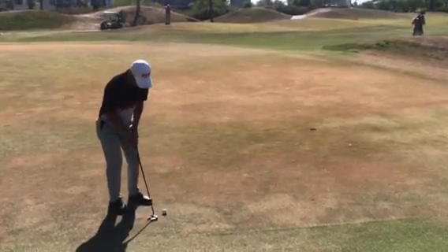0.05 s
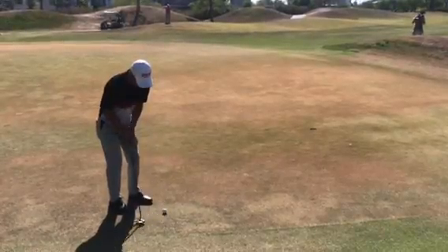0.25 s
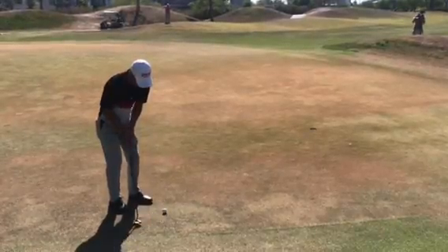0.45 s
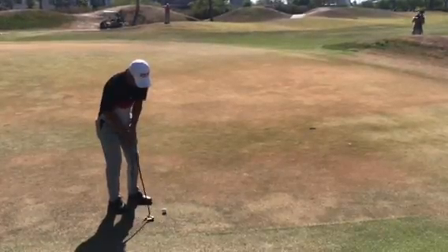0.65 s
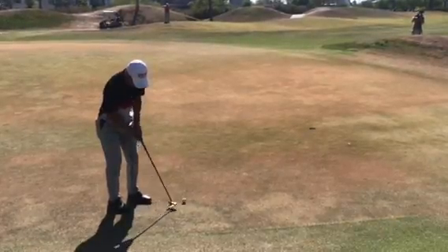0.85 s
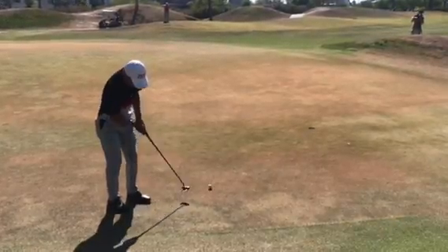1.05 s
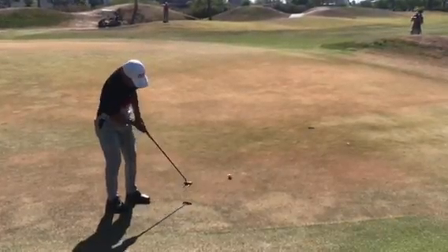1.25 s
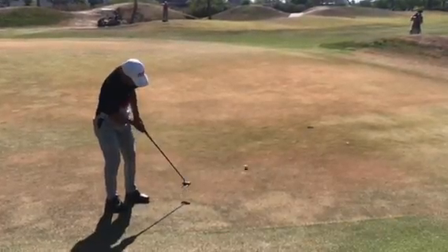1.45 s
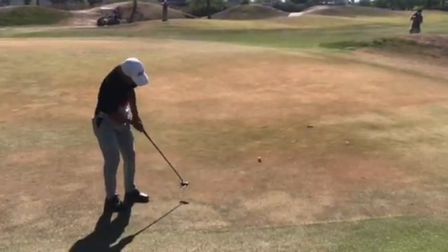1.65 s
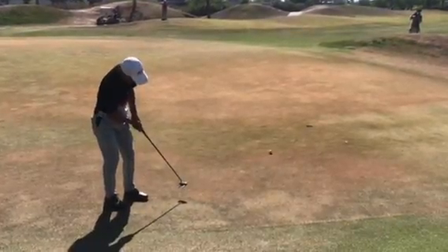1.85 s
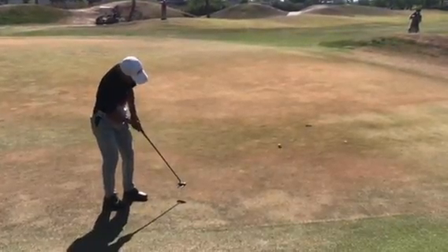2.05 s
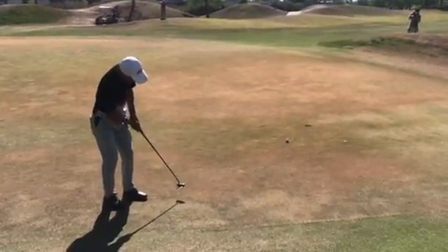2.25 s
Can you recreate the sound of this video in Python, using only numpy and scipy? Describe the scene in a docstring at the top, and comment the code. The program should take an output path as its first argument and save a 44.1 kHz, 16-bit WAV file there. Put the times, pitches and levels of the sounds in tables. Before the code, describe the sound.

A golf putt makes one short, dry click at about 0.9 seconds, a few metres away on an open green. Low wind starts softly over a faint hush, then buffets the microphone with uneven thumps from about 0.5 seconds. The gusts hit hardest around 1.5 seconds and ease toward the end. Three very faint, distant bird calls pass at roughly 0.3, 0.6 and 1.6 seconds.

```python
"""A putt on an open golf green, a few metres from the microphone, on a breezy day.
Wind rises over a distant hush and a thin hiss, and two faint bird calls pass far off.
From about 0.5 s gusts buffet the microphone hard. At 0.87 s the putter meets the ball
with one dry click, and its steel head rings faintly on. The wind thumps hardest
around 1.5 s, a third, higher bird follows, and the gusts ease away."""
import sys
import numpy as np
from scipy import signal
from scipy.io import wavfile
from scipy.ndimage import uniform_filter1d

SR = 44100
rng = np.random.default_rng(int(sys.argv[2]) if len(sys.argv) > 2 else 0)


def int16_out(signal):
    """Quantize to a 16-bit WAV file."""
    q = np.round(np.clip(np.atleast_2d(signal).T, -1, 1) * 32767)
    wavfile.write(sys.argv[1], SR, q.astype(np.int16))


N = 105840
TIME = np.arange(N) / SR
CUTOFF_HZ = 15800   # top of the microphone's range


def from_db(db):
    """Decibels to gain."""
    return 10 ** (np.asarray(db) / 20)


def rms_one(x):
    """Scale to an rms of one."""
    return x / np.sqrt(np.mean(x ** 2) + 1e-20)


def at_hz(points, hz):
    """Read a spectrum on a log-frequency axis."""
    freqs, db = np.transpose(points)
    return np.interp(np.log(hz), np.log(freqs), db)


def drift(rate_hz):
    """Smooth random wander with an rms of one."""
    step, run_in = 40, 2000   # samples per point, points dropped while the filter settles
    pole = np.exp(-2 * np.pi * rate_hz * step / SR)
    noise = rng.standard_normal(N // step + run_in + 2)
    slow = signal.lfilter([1], [1, -2 * pole, pole * pole], noise)[run_in:]
    return np.interp(np.arange(N) / step, np.arange(len(slow)), rms_one(slow))


def band_noise(low, high):
    """White noise through a steep, settled band-pass."""
    sos = signal.butter(4, [low, min(high, .45 * SR)], "band", fs=SR, output="sos")
    return signal.sosfilt(sos, rng.standard_normal(N + SR))[SR:]


def noise_bands(spectrum, count):
    """Half-octave noise bands from 20 Hz up, together about one in rms: (centres, bands)."""
    edges = 20 * 2 ** (np.arange(count + 1) / 2)
    centres = np.sqrt(edges[:-1] * edges[1:])
    gains = from_db(at_hz(spectrum, centres)) * np.sqrt(np.diff(edges))
    gains = gains / np.linalg.norm(gains)
    return centres, [g * rms_one(band_noise(lo, hi)) for g, lo, hi in zip(gains, edges, edges[1:])]


def hush(level_db=-61, waver_db=0.32):
    """Steady far-off air over the course, wavering a little in each band."""
    # colour of the distant air: (frequency [Hz], relative density [dB])
    spectrum = [(100, -1.5), (300, -2.5), (650, -2), (1000, -9), (1500, -18), (2000, -24.5), (2800, -26.5),
                (4500, -29.5), (7500, -33), (9500, -35), (13000, -49)]
    _, bands = noise_bands(spectrum, count=20)
    return from_db(level_db) * sum(band * from_db(-waver_db * drift(rate_hz=13)) for band in bands)


def hiss(low_hz=10800):
    """A thin, high hiss that slowly rises and falls."""
    # course of the hiss: (time [s], level [dB])
    levels = [(0, -83.5), (.7, -86), (1.05, -84), (1.7, -87.5), (2.0, -84.5), (2.18, -81), (2.35, -86)]
    level_db = np.interp(TIME, *np.transpose(levels))
    return from_db(level_db) * rms_one(band_noise(low_hz, CUTOFF_HZ))


def birds():
    """Birds far from the microphone: each call is a soft swell of narrow-band noise."""
    # distant calls: (start [s], length [s], pitch [Hz], bandwidth [Hz], peak level [dB])
    calls = [(.27, .12, 1516, 132, -72.5), (.622, 0.054, 1800, 24.6, -70), (1.60, .19, 4470, 500, -80.5)]
    out = 0
    for start, length, hz, width, db in calls:
        swell = np.sin(np.pi * np.clip((TIME - start) / length, 0, 1))
        out = out + from_db(db) * swell * rms_one(band_noise(hz - width / 2, hz + width / 2))
    return out


def rumble(gain_db=5.5):
    """The largest eddies make a deep, even rumble that swells with the breeze."""
    # colour of the rumble: (frequency [Hz], relative density [dB])
    spectrum = [(20, -26.5), (33, -12), (47, -1), (67, 1), (95, -4.5), (135, -18.5), (200, -25)]
    # swell of the breeze: (time [s], relative level [dB])
    swell = [(0.0, -56.5), (0.16, -46.5), (0.76, -36.5), (0.83, -40.5), (0.9, -33), (1.0, -51), (1.06, -35),
             (1.16, -54.5), (1.26, -28), (1.32, -63), (1.35, -31), (1.4, -41.5), (1.64, -35), (1.69, -46.5),
             (2.12, -40.5), (2.14, -51), (2.33, -43.5), (2.4, -64)]
    noise = sum(noise_bands(spectrum, count=7)[1])
    running_rms = np.sqrt(uniform_filter1d(noise ** 2, size=5000) + 1e-9)
    level_db = gain_db + np.interp(TIME, *np.transpose(swell))
    return from_db(level_db) * noise / running_rms


def gusts(gain_db=-2.5, ceiling_db=-26, flutter_db=0.4):
    """Turbulence on the microphone: stronger gusts are louder and brighter, and all of it flutters."""
    # gust strength at the microphone, before the ceiling: (time [s], relative level [dB])
    strength = [(0.0, -57), (0.2, -48), (0.31, -45), (0.48, -53.5), (0.53, -32), (0.62, -30), (0.64, -20),
                (0.66, -28), (0.73, -21.5), (0.75, -50), (0.77, -20.5), (0.95, -34.5), (0.98, -50.5),
                (1.05, -29.5), (1.09, -35.5), (1.2, -43.5), (1.23, -27.5), (1.3, -33), (1.32, -57),
                (1.33, -29.5), (1.36, -28), (1.39, -42.5), (1.51, -17), (1.53, -30.5), (1.62, -24),
                (1.7, -41.5), (1.77, -44.5), (1.79, -56), (1.86, -31), (1.87, -47.5), (2.04, -40.5),
                (2.09, -26), (2.11, -39), (2.25, -46), (2.31, -39), (2.4, -62)]
    # colour of the gusts: (frequency [Hz], relative density [dB])
    spectrum = [(50, -7.5), (100, 5), (180, 3), (270, -7.5), (380, -25), (540, -27), (760, -40.5),
                (1100, -58), (2000, -70.5)]
    brighten, brighten_above_hz = 0.04, 360   # extra dB per octave for each dB of swing
    gust_db = np.minimum(np.interp(TIME, *np.transpose(strength)), ceiling_db)
    swing_db = gust_db - gust_db.mean() + flutter_db * drift(rate_hz=110)
    out = 0
    for hz, band in zip(*noise_bands(spectrum, count=14)):
        octaves = np.clip(np.log2(hz / brighten_above_hz), 0, 2)
        out = out + band * from_db(swing_db * (1 + brighten * octaves))
    return from_db(gain_db + gust_db.mean()) * out


def eddy(time, db, hz):
    """One smooth push and pull of pressure, centred on the given time."""
    phase = 2 * np.pi * hz * (TIME - time)
    bell = np.exp(np.maximum((1 - phase ** 2) / 2, -60))
    return from_db(db) * phase * bell


def buffets(curl_db=-22, curl_hz=384):
    """Single eddies thump the microphone, each with a small curl riding on it."""
    # eddies striking the microphone: (time [s], peak level [dB], centre frequency [Hz])
    thumps = [(0.3, -26, 124), (0.406, -30.5, 139), (0.443, -29.5, 64), (.541, -18.5, 141),
              (.576, -30, 170), (.595, -27.5, 220), (.641, -16.5, 188), (.664, -27.5, 204),
              (0.678, -26.5, 181), (0.703, -20, 194), (.730, -18, 175), (.739, -24, 81.7),
              (0.7779, -16.5, 176), (0.8, -26.5, 216), (0.857, -23.5, 176), (0.8876, -22, 167),
              (.907, -19.5, 85), (0.951, -24.5, 176), (1.102, -28.5, 170), (1.2747, -21.5, 150),
              (1.336, -32, 187), (1.354, -22.5, 162), (1.431, -30, 240), (1.4535, -32.5, 312),
              (1.5071, -14, 166.7), (1.5774, -25.5, 439), (1.589, -14.5, 204), (1.5948, -25.5, 392),
              (1.616, -19.5, 208), (1.637, -22.5, 73.6), (1.763, -29.5, 121), (1.852, -24, 91),
              (2.0911, -26.5, 169.5), (2.189, -33, 102)]
    return sum(eddy(time, db, hz) - eddy(time, db + curl_db, curl_hz) for time, db, hz in thumps)


def ring(start, hz, db, t60):
    """A struck mode: a sine that dies away by 60 dB in t60 seconds."""
    age = np.maximum(TIME - round(start * SR) / SR, 0)
    return from_db(db - 60 * np.minimum(age / t60, 4)) * np.sin(2 * np.pi * hz * age)


def putt(strike_s=0.8748, contact_s=0.00055):
    """The blow knocks ball and face and sets the steel head ringing; the ball leaves with a tick."""
    # modes of ball and putter face: (frequency [Hz], level [dB], t60 [s])
    modes = [(820, -30.5, 0.0044), (1130, -35.5, 0.0074), (1550, -50, 0.023), (2570, -48.5, 0.011),
             (3334, -49.5, 0.024), (5050, -51.5, 0.013), (8400, -56.5, 0.0049), (9400, -54, 0.0034)]
    knock = sum(ring(strike_s, *mode) for mode in modes)
    head = ring(strike_s, hz=5459, db=-70.5, t60=0.27)
    tick = ring(strike_s + contact_s, hz=13800, db=-38, t60=0.0011)
    return knock + head + tick


def scene():
    """One microphone on the green: wind right on it, the putt a few metres off, the course beyond."""
    wind = gusts() + rumble() + buffets()
    return (wind + putt() + birds() + hush() + hiss())[None]


def record(dry):
    """The microphone sheds the deepest bass and cuts the top steeply."""
    low_cut = signal.butter(3, 32, "high", fs=SR, output="sos")
    high_cut = signal.butter(16, CUTOFF_HZ, fs=SR, output="sos")
    return signal.sosfilt(high_cut, signal.sosfilt(low_cut, dry))


dry = scene()
out = record(dry)
int16_out(out)
```